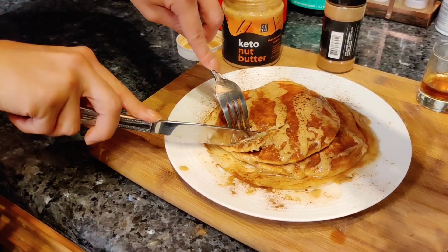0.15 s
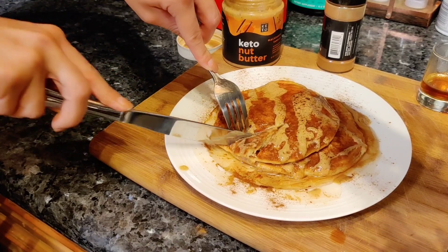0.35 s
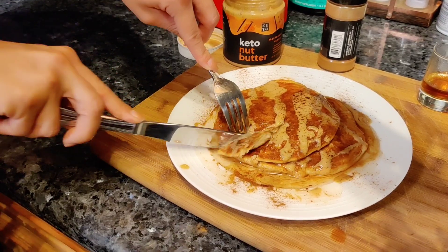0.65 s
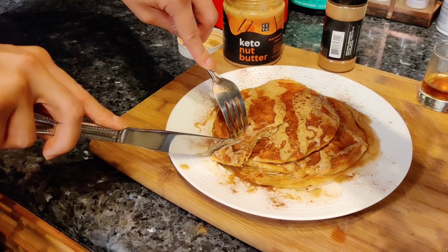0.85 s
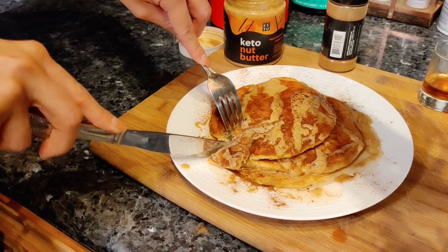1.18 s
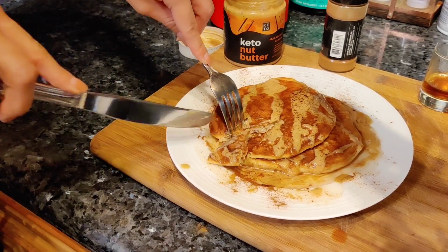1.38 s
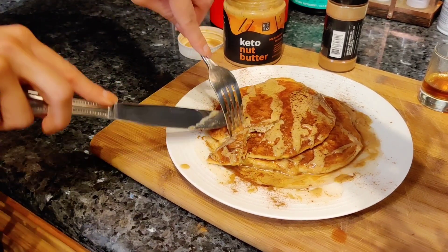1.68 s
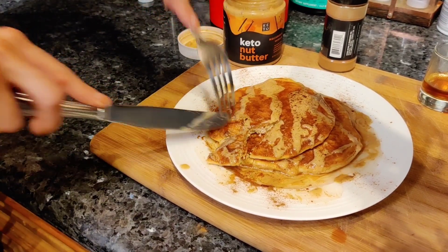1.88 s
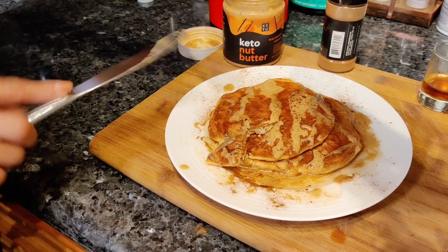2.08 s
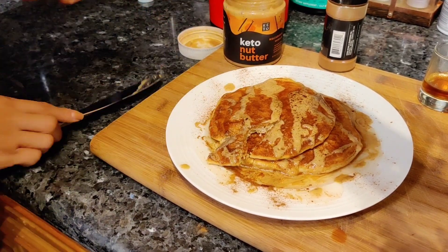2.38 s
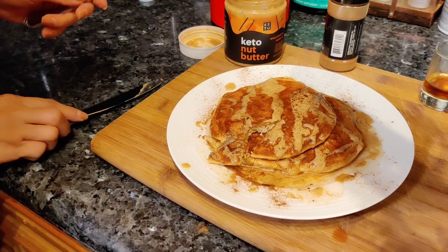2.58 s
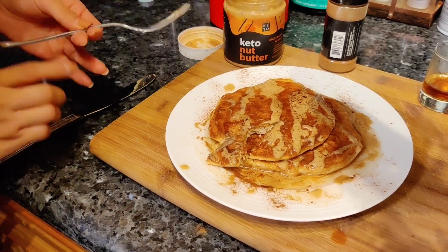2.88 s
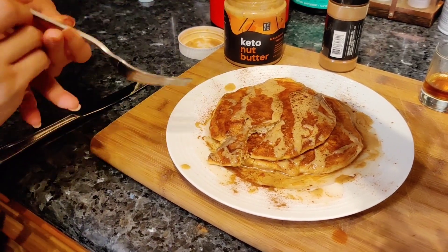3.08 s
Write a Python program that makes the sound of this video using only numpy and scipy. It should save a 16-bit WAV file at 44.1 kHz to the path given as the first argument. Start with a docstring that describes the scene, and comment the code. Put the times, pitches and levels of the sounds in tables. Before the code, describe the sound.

Cutlery on a plate, close and left of centre in a small kitchen: a soft blade knock at 0.15 s, a stronger one at 0.56, faint rubbing 0.45-0.8, tiny squeak near 1.0, clink at 1.15, dull tap at 1.3. Near quiet over low rumble follows. The knife clacks brightly on stone at 2.58; the fork hits loudest at 2.75, bounces and rattles until 3.02, ringing briefly.

```python
"""A steel knife cuts pancakes on a ceramic plate, close by in a small kitchen: the blade knocks through
to the plate, rubs and squeaks, and light taps let the plate ring. The knife is then laid on the stone
counter; the fork drops beside it, bounces and rattles to rest over a low room rumble. Contacts are
chattering forces that drive coloured noise and decaying modes; rubbing is a train of random slips,
the squeak a wavering sine; a short diffuse echo follows, and the rumble is filtered noise."""
import sys
import numpy as np
from scipy import signal
from scipy.fft import rfft, irfft
from scipy.io import wavfile
from scipy.ndimage import uniform_filter1d

SR = 44100
rng = np.random.default_rng(int(sys.argv[2]) if len(sys.argv) > 2 else 0)


def store_pcm(level_fs):
    """Save levels as 16-bit WAV."""
    pcm = np.round(np.clip(level_fs, -1, 1) * 32767).astype(np.int16)
    wavfile.write(sys.argv[1], SR, np.atleast_2d(pcm).T)


N = 143325
SIZE = 24000  # samples in the sound of one contact
T = np.arange(SIZE) / SR


def undb(db):
    """Level law: decibels to an amplitude ratio."""
    return 10 ** (np.asarray(db) / 20)


def unit(x):
    """Energy normalisation: each channel is scaled to unit energy."""
    return x / np.sqrt(np.sum(x ** 2, axis=-1, keepdims=True) + 1e-18)


def pan(db):
    """Constant-power panning: gains for a left-over-right level difference in dB."""
    gains = undb(np.array([[db], [-db]]) / 2)
    return gains / np.sqrt(np.mean(gains ** 2))


def colour(x, points):
    """Minimum-phase filtering: a causal response through (frequency [Hz], gain [dB]) points."""
    n = x.shape[-1]
    hz, db = np.array(points, float).T
    log_hz = np.log(np.fft.rfftfreq(n, 1 / SR) + 1)
    gain = undb(np.interp(log_hz, np.log(hz), db))
    # folding the cepstrum onto positive times makes the response causal
    cepstrum = irfft(np.log(gain), n)
    cepstrum[1:n // 2] *= 2
    cepstrum[n // 2 + 1:] = 0
    return irfft(rfft(x) * np.exp(rfft(cepstrum)), n)


def fade(t60):
    """Exponential decay: amplitude falls by 60 dB in t60 seconds."""
    return np.exp(-np.log(1000) * T / max(t60, 1e-3))


def add(out, start, x):
    """Superposition: a sound is summed into the scene from its start time in seconds."""
    i = max(int(start * SR), 0)
    out[:, i:i + x.shape[1]] += x[:, :N - i]


CHATTER_PER_S, CHATTER_SIZE = 1400, 0.77  # mean rebound rate; initial size against the first touch
TOUCH_CHATTER_S = 0.0012  # decay time constant of a light touch


def contact(chatter_s):
    """Repeated impact: a first touch and a dying burst of tiny random rebounds."""
    rebounds = (rng.random(SIZE) < CHATTER_PER_S / SR) * rng.standard_normal(SIZE)
    force = rebounds * CHATTER_SIZE * np.exp(-T / chatter_s)
    force[0] = 1
    return unit(force)


CLICK_LIKENESS = 0.24  # share of noise power common to both ears


def click(force, points, t60):
    """High modal density: dense, quickly damped vibration acts as coloured decaying noise."""
    separate = np.sqrt(1 - CLICK_LIKENESS) * rng.standard_normal((2, SIZE))
    common = np.sqrt(CLICK_LIKENESS) * rng.standard_normal(SIZE)
    burst = (separate + common) * fade(t60)
    driven = irfft(rfft(burst) * rfft(force))
    return unit(colour(driven, points))


RING_WANDER, WANDER_S = 0.46, 0.0055  # phase wander [rad rms], its averaging time [s]
RING_SPREAD = 0.61  # largest random phase offset drawn for each ear [cycles]


def ring(force, pitches, modes):
    """Modal decay: modes store contact energy and let it die; phase wanders as the contact shifts."""
    out = 0
    span = max(int(WANDER_S * SR), 1)
    for hz, (db, t60) in zip(pitches, modes):
        energy = signal.lfilter([1], [1, -fade(t60)[1] ** 2], force ** 2 + 1e-18)
        drift = uniform_filter1d(rng.standard_normal(SIZE), span, mode="wrap")
        wander = RING_WANDER * np.sqrt(span) * drift
        phase = rng.random() + RING_SPREAD * rng.random((2, 1))
        mode = np.sqrt(energy) * np.sin(2 * np.pi * (hz * T + phase) + wander)
        out = out + undb(db) * unit(mode)
    return unit(out)


# spectrum of the room rumble and hiss: (frequency [Hz], level [dB])
FLOOR_COLOUR = [(12, -19.5), (20, 2), (44, -7.5), (93, -9), (163, -17), (330, -18.5), (678, -26.5),
                (4300, -41), (8650, -47.5), (14700, -42.5)]
FLOOR_DB = -52
FLOOR_LIKENESS = 0.063  # power of the common noise against the separate noise
FLOOR_BASS_DB = -7  # bass gain on the left, opposite on the right


def room_tone():
    """Stationary noise: a steady rumble, stronger on the right, under a faint hiss."""
    noise = rng.standard_normal((2, N)) + np.sqrt(FLOOR_LIKENESS) * rng.standard_normal(N)
    channels = []
    for channel, side in zip(noise, (1, -1)):
        bass_tilt = [(30, side * FLOOR_BASS_DB), (130, 0.005)]
        channels.append(colour(colour(channel, FLOOR_COLOUR), bass_tilt))
    tone = np.array(channels)
    return undb(FLOOR_DB) * tone / tone.mean(0).std()


# echo of counter and cupboards in bands: (frequency [Hz], level [dB], t60 [s])
KITCHEN_BANDS = [(307, 0, 0.11), (1000, -14.5, 0.31), (2500, -6.5, 0.21), (5300, -7, 0.18),
                 (11000, -11.5, 0.18)]
ROOM_CROSS = 0.2  # amplitude fed from the opposite channel


def kitchen(x):
    """Diffuse reverberation: counter and cupboards give a short echo that decays by frequency band."""
    centres, levels, t60s = np.array(KITCHEN_BANDS).T
    noise = rfft(rng.standard_normal((2, SIZE)))
    log_hz = np.log(np.fft.rfftfreq(SIZE, 1 / SR) + 1)
    echo = np.zeros((2, SIZE))
    for db, t60, weights in zip(levels, t60s, np.eye(len(centres))):
        band = irfft(noise * np.interp(log_hz, np.log(centres), weights))
        build_up = 1 - np.exp(-T / 0.0034)
        echo += undb(db) * band * unit(fade(t60) * build_up)
    return signal.fftconvolve(x + ROOM_CROSS * x[::-1], echo, axes=1)[:, :N]


# path of the blade's squeak on the glaze: (time [s], pitch [Hz], level [dB])
SQUEAK_PATH = [(0.965, 1980, -85), (0.981, 1970, -61), (1.011, 2270, -71), (1.04, 2400, -67),
               (1.07, 2230, -69), (1.11, 2190, -85)]
SQUEAK_JITTER, SQUEAK_PAN_DB = 0.0378, 20  # rms fraction of the pitch; left over right


def squeak():
    """Stick-slip friction: the blade sticks and slips on the glaze at an unsteady pitch."""
    t = np.arange(N) / SR
    when, hz, db = np.array(SQUEAK_PATH).T
    jitter = uniform_filter1d(rng.standard_normal(N), size=100)
    pitch = np.interp(t, when, hz) * (1 + SQUEAK_JITTER * jitter / jitter.std())
    loud = np.interp(t, when, undb(db), left=0, right=0)
    tone = np.sqrt(2) * np.sin(2 * np.pi * np.cumsum(pitch) / SR)
    return tone * loud * pan(SQUEAK_PAN_DB)


# strokes of the blade through the pancake: (time [s], length [s], level [dB])
RUB_STROKES = [(0.461, 0.19, -59), (0.69, 0.13, -57)]
# spectrum of the rubbing: (frequency [Hz], level [dB])
RUB_SPECTRUM = [(300, -8), (1900, -9.5), (2300, -4), (2700, -12), (4900, -14.5), (5450, -3.5), (6100, -20),
                (16000, -22)]
RUB_GRAINS_PER_S, RUB_PAN_DB = 1700, 8  # mean slip rate; left over right


def rubbing():
    """Granular friction: tiny random slips of the blade swell and fade with each stroke."""
    t = np.arange(N) / SR
    effort = np.zeros(N)
    for start, length_s, db in RUB_STROKES:
        effort += undb(db) * np.sin(np.pi * np.clip((t - start) / length_s, 0, 1))
    slips = (rng.random(N) < RUB_GRAINS_PER_S / SR) * rng.standard_normal((2, N))
    rub = np.sqrt(N) * unit(colour(slips, RUB_SPECTRUM))  # unit rms
    return rub * effort * pan(RUB_PAN_DB)


# knife laid on the counter, later nudged: (time [s], level [dB], chatter decay [s], left over right [dB])
KNIFE_CONTACTS = [(2.584, -4.5, 0.018, -7), (2.5858, -1, 0.015, 1.5), (2.612, -11.5, 0.032, 2.5),
                  (2.872, -3.5, 0.0052, 1.5)]
# spectrum of the knife's click on stone: (frequency [Hz], level [dB])
KNIFE_CLICK_COLOUR = [(150, -10.5), (1300, -6.5), (2000, -18.5), (3200, -2), (4200, -5), (4600, -19),
                      (5300, 4), (7300, -2.5), (14000, 5), (16000, -8.5)]
# knife mode pitches: (frequency [Hz])
KNIFE_PITCHES = (4221, 5486, 6950, 8549, 10990, 12800, 15300)
# knife modes, one for each pitch: (level [dB], t60 [s])
KNIFE_RING_MODES = [(-8.5, 0.13), (-17, 0.11), (-11, .1), (0.5, .045), (-4, 0.069), (0, .08), (1.5, 0.082)]
KNIFE_CLICK_T60, KNIFE_RING_DB = 0.077, -1.5  # s; ring against click


def knife_down():
    """Impact excitation: the blade chatters brightly on the stone and its modes ring."""
    out = np.zeros((2, N))
    for start, db, chatter_s, pan_db in KNIFE_CONTACTS:
        force = contact(chatter_s)
        clack = click(force, KNIFE_CLICK_COLOUR, KNIFE_CLICK_T60)
        rings = undb(KNIFE_RING_DB) * ring(force, KNIFE_PITCHES, KNIFE_RING_MODES)
        add(out, start, undb(db) * pan(pan_db) * (clack + rings))
    return out


# single tines heard as the fork rocks:
# (time [s], length [s], pitch [Hz], level [dB], left over right [dB])
TINE_TONES = [(2.8439, 0.011, 8640, -19.5, 8.5), (2.914, .04, 8593, -24.5, 12),
              (2.93, 0.019, 15342, -26, 15), (2.943, 0.03, 12620, -25.5, 2)]
# pitches that ring on once the fork lies still: (frequency [Hz])
REST_PITCHES = (5352, 4344)
# modes of the resting fork, one for each pitch: (level [dB], t60 [s])
REST_RING_MODES = [(-4.5, 0.38), (-5, 0.37)]
REST_S, REST_DB, REST_PAN_DB = 3.022, -16.5, 12  # start; level; left over right


def fork_singing():
    """Free vibration: single tine modes swell as the fork rocks, then two clear tones ring on."""
    out = np.zeros((2, N))
    for start, length_s, hz, db, pan_db in TINE_TONES:
        swell = np.sin(np.pi * np.clip(T / length_s, 0, 1))
        phase = RING_SPREAD * rng.random((2, 1))
        tone = np.sqrt(2) * np.sin(2 * np.pi * (hz * T + phase))
        add(out, start, undb(db) * pan(pan_db) * swell * tone)
    rest = ring(contact(TOUCH_CHATTER_S), REST_PITCHES, REST_RING_MODES)
    add(out, REST_S, undb(REST_DB) * pan(REST_PAN_DB) * rest)
    return out


# fork hitting the counter: (time [s], clack level [dB], flat ring level [dB], tine ring level [dB],
# handle knock level [dB], chatter decay [s], left over right [dB])
FORK_CONTACTS = [(2.7493, 4.5, 11, -14, 1, 0.0026, 14.5), (2.7522, 1, 11.5, -6, 0.5, 0.0039, 8.5),
                 (2.7615, 3.5, 5, -15, -7, 0.017, 11), (2.8465, -4.5, -17, -4.5, -8.5, 0.0027, 6),
                 (2.856, 1.5, -8, -21, -3, 0.0016, 11), (2.87, -7, -8, -8, -13.5, 0.015, 0),
                 (2.8827, 1.5, -15, 7, -2.5, .007, 4.5), (2.897, -2, -13, 1.5, -1.5, 0.021, -4.5),
                 (2.9202, -1, -15, 1.5, -6.5, 0.021, 4), (2.944, -0.5, -6, 2, -12, 0.032, 1),
                 (2.9645, 1, -8.5, 4, -10.5, 0.015, 9.5), (2.988, -1.5, -33, -2.5, -4, 0.019, 18),
                 (3.022, -9, -38, -11.5, -3.5, .006, 9)]
# spectrum of the fork's clack on stone: (frequency [Hz], level [dB])
FORK_CLICK_COLOUR = [(250, -1.5), (400, -1), (700, 2.5), (1100, 1), (3200, 5), (7200, -2), (9800, -15),
                     (10900, 5.5), (11900, -32), (12900, 1), (16000, -15)]
# fork mode pitches: (frequency [Hz])
FORK_PITCHES = (1058, 2110, 3270, 3598, 4177, 4838, 5335, 6640, 6985, 8628, 8965, 10568, 11022, 12805,
                13552, 15342)
# fork modes, one for each pitch: (level landing flat [dB], level landing on the tines [dB], t60 [s])
FORK_RING_MODES = [(-12, -12.5, 0.161), (-15, -14, 0.24), (-22, -13, 0.1), (-7.5, -8, 0.12),
                   (-11, -8, 0.14), (-20.5, -14, 0.23), (-6, -6, 0.077), (-7.5, -5.5, 0.04),
                   (-2, -28, 0.14), (-9.5, 1, 0.087), (-5, -20.5, .05), (-17, -4.5, 0.12),
                   (-5.5, -6, 0.097), (-8, -7.5, 0.069), (-8, -12.5, .11), (-5, -8.5, 0.039)]
# pitches of the handle's knock on stone: (frequency [Hz])
HANDLE_PITCHES = (517, 715, 1085, 1510, 1590)
# handle modes, one for each pitch: (level [dB], t60 [s])
HANDLE_KNOCK_MODES = [(-14.5, 0.11), (-7.5, 0.36), (-1, 0.032), (-6, 0.093), (-3, 0.013)]
FORK_CLICK_T60, FORK_LAG_S = 0.065, 0.00024  # s; delay of the left ear


def fork_down():
    """Modal excitation by place: flat, tine and handle contacts weight modes as the fork bounces and rocks."""
    out = np.zeros((2, N))
    flat_levels, tine_levels, t60s = np.array(FORK_RING_MODES, float).T
    flat_gains, tine_gains = unit(undb(flat_levels)), unit(undb(tine_levels))
    for start, clack_db, flat_db, tine_db, handle_db, chatter_s, pan_db in FORK_CONTACTS:
        force = contact(chatter_s)
        clack = undb(clack_db) * click(force, FORK_CLICK_COLOUR, FORK_CLICK_T60)
        # the energies of the flat and tine contacts add
        gains = np.hypot(undb(flat_db) * flat_gains, undb(tine_db) * tine_gains)
        modes = zip(20 * np.log10(gains), t60s)
        rings = np.linalg.norm(gains) * ring(force, FORK_PITCHES, modes)
        handle = undb(handle_db) * ring(force, HANDLE_PITCHES, HANDLE_KNOCK_MODES)
        add(out, start, pan(pan_db) * (clack + rings + handle))
    out[0] = np.roll(out[0], int(FORK_LAG_S * SR))  # reaches the left ear later
    return out


# light taps on the plate: (time [s], click level [dB], ring level [dB], board thud level [dB],
# ring time factor [ratio], left over right [dB])
PLATE_TAPS = [(1.148, -9.5, -15, -30.5, 0.61, 12.5), (1.2923, -26.5, -31.5, -12, 0.58, 13),
              (1.2993, -32.5, -17.5, -19, 1.1, 16), (1.7427, -32, -53, -45, .5, 5),
              (2.208, -35, -38, -50, 0.43, 21)]
# spectrum of the click on the plate: (frequency [Hz], level [dB])
PLATE_CLICK_COLOUR = [(200, -14), (500, 4.5), (850, -6), (1160, 14.5), (1520, -2), (2100, 10),
                      (3800, -10.5), (4350, 6), (6400, 0), (7400, -5.5), (16000, -43)]
# spectrum of the thud of the wooden board: (frequency [Hz], level [dB])
BOARD_THUD_COLOUR = [(200, -5), (320, -1), (480, -7), (640, 10), (850, -5), (1300, -19.5), (16000, -69.5)]
# free plate mode pitches: (frequency [Hz])
PLATE_PITCHES = (1140, 1832, 2654, 3130, 3578, 4340, 4615, 5080, 5800)
# free plate modes, one for each pitch: (level [dB], t60 before the ring time factor [s])
PLATE_RING_MODES = [(0, 0.1), (-4.5, 0.41), (-4, .25), (-1, 0.03), (-6.5, 0.47), (-15, 0.091), (-0.5, .11),
                    (-6, 0.086), (-5, 0.052)]
PLATE_CLICK_T60, BOARD_T60 = 0.062, 0.058  # s


def tapping():
    """Contact damping: the tapped plate rings and thuds on its wooden board; a firm touch cuts the ring short."""
    out = np.zeros((2, N))
    for start, click_db, ring_db, thud_db, sustain, pan_db in PLATE_TAPS:
        force = contact(TOUCH_CHATTER_S)
        modes = [(db, t60 * sustain) for db, t60 in PLATE_RING_MODES]
        tap = undb(click_db) * click(force, PLATE_CLICK_COLOUR, PLATE_CLICK_T60)
        rings = undb(ring_db) * ring(force, PLATE_PITCHES, modes)
        thud = undb(thud_db) * click(force, BOARD_THUD_COLOUR, BOARD_T60)
        add(out, start, pan(pan_db) * (tap + rings + thud))
    return out


# blade pressed down onto the plate: (time [s], level [dB],
# brightness [fifth of the dB tilt from 500 to 16000 Hz], plate knock level [dB], left over right [dB])
BLADE_CUTS = [(0.1489, -11.5, -2.5, -15, 12), (0.5587, 4.5, 0.2, -7, 12.5), (0.975, -28.5, -2.5, -47, 11)]
# spectrum of the blade's click: (frequency [Hz], level [dB])
BLADE_CLICK_COLOUR = [(150, -29), (500, -6), (860, 3), (1080, -10.5), (1900, -7), (2300, 3), (2850, -1.5),
                      (3400, 3), (4600, -16), (5050, 1), (7200, -17), (9500, -13), (16000, -25.5)]
# pitches of the blade pressed on the plate: (frequency [Hz])
BLADE_PITCHES = (885, 1700, 2160, 2275, 2345, 3420, 5020, 5110, 5430, 5986)
# modes of the pressed blade, one for each pitch: (level [dB], t60 [s])
BLADE_RING_MODES = [(-9, 0.054), (-11.5, 0.12), (-3.5, 0.024), (1, 0.034), (2, 0.07), (-19, 0.13),
                    (-2, 0.034), (-12, .09), (-7.5, 0.11), (-14, .08)]
# hollow knock of the damped plate under the blade: (frequency [Hz], level [dB])
PLATE_KNOCK_COLOUR = [(600, -25), (800, -6), (885, -6.5), (1050, -24.5), (4000, -69)]
CUT_CHATTER_S, BLADE_T60, BLADE_RING_DB = 0.0011, 0.06, 2.5  # decay constant; s; ring against click


def cutting():
    """Damped impact: the blade breaks through and knocks on the plate, which the pancake damps."""
    out = np.zeros((2, N))
    for start, db, tilt_db, knock_db, pan_db in BLADE_CUTS:
        force = contact(CUT_CHATTER_S)
        rings = undb(BLADE_RING_DB) * ring(force, BLADE_PITCHES, BLADE_RING_MODES)
        blade = click(force, BLADE_CLICK_COLOUR, BLADE_T60) + rings
        blade = colour(blade, [(500, -2 * tilt_db), (16000, 3 * tilt_db)])
        knock = undb(knock_db) * click(force, PLATE_KNOCK_COLOUR, BLADE_T60)
        add(out, start, pan(pan_db) * (undb(db) * blade + knock))
    return out


CONTACT_DB = -1.5  # impacts and rings against friction


def scene():
    """Superposition: direct sound of impacts and friction, its echo, and the room tone add up."""
    impacts = cutting() + tapping() + knife_down() + fork_down() + fork_singing()
    direct = undb(CONTACT_DB) * impacts + rubbing() + squeak()
    return direct + kitchen(direct) + room_tone()


TOP_HZ = 15900  # passband edge


def record(dry):
    """Band limiting: the recorder's steep elliptic low-pass removes the extreme treble."""
    low_pass = signal.ellip(8, .2, 70, TOP_HZ, fs=SR, output="sos")  # ripple and rejection in dB
    return signal.sosfilt(low_pass, dry)


dry = scene()
out = record(dry)
store_pcm(out)
```